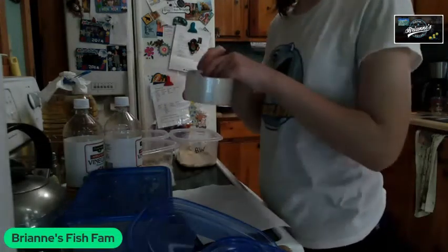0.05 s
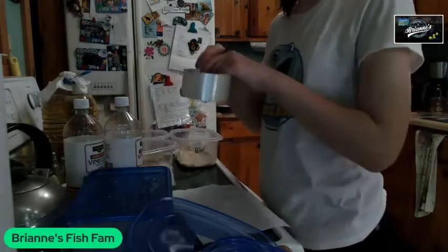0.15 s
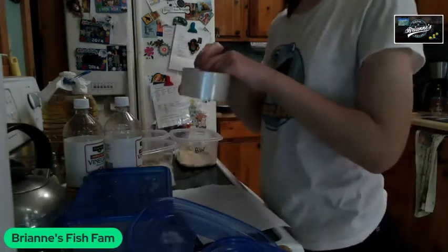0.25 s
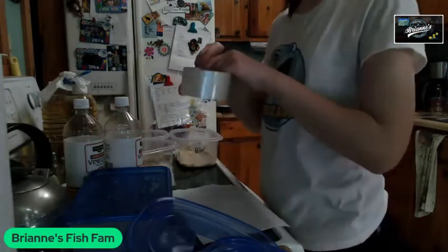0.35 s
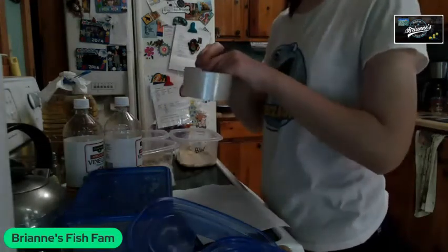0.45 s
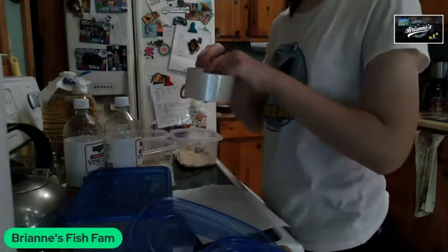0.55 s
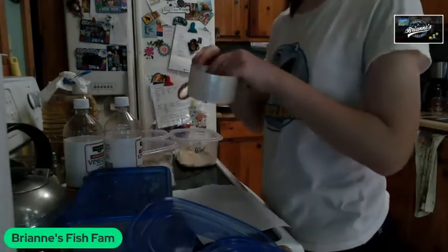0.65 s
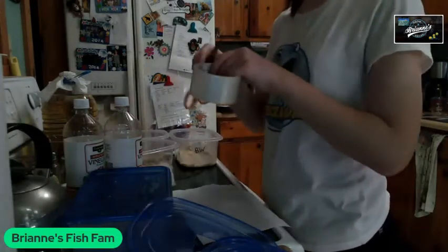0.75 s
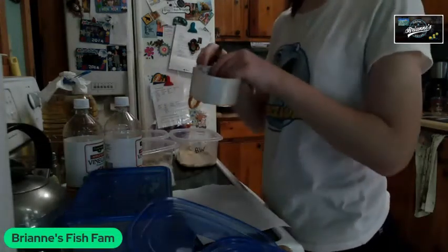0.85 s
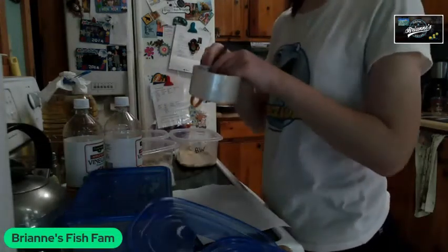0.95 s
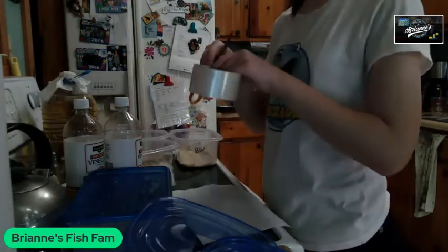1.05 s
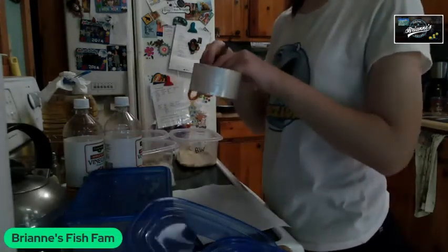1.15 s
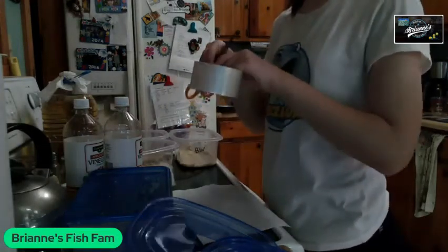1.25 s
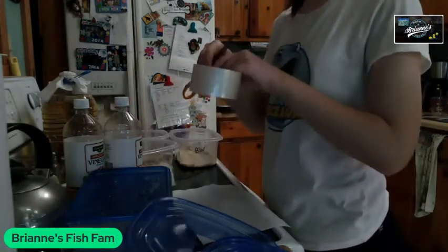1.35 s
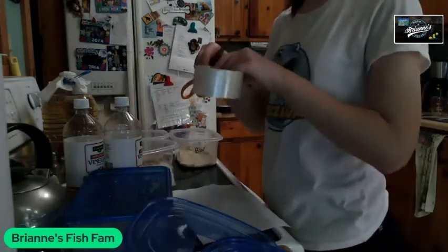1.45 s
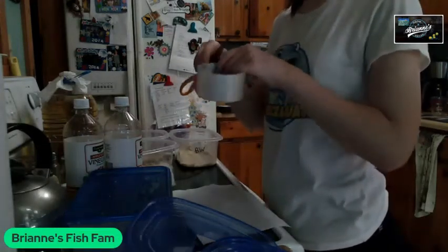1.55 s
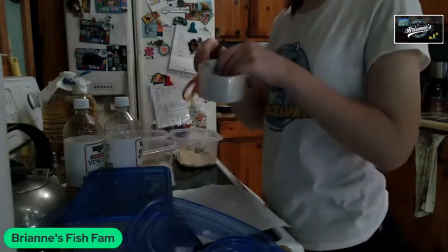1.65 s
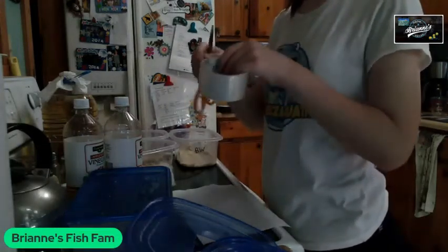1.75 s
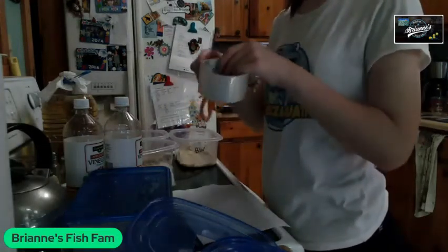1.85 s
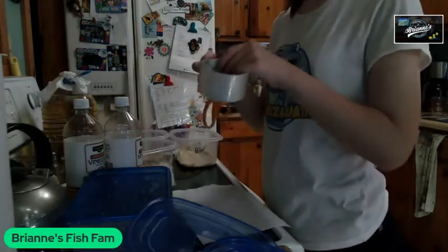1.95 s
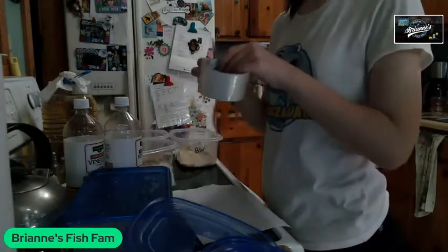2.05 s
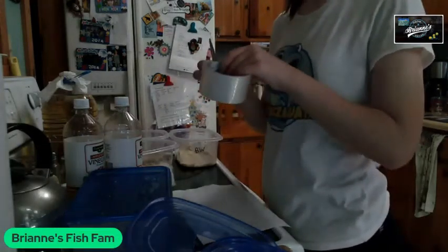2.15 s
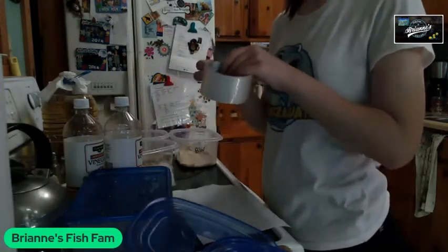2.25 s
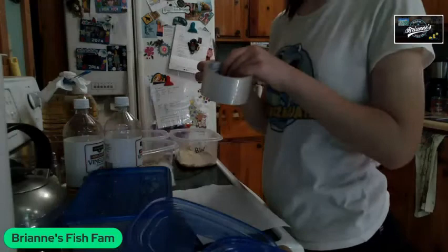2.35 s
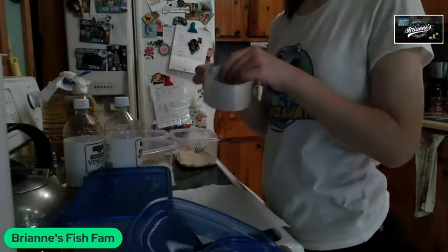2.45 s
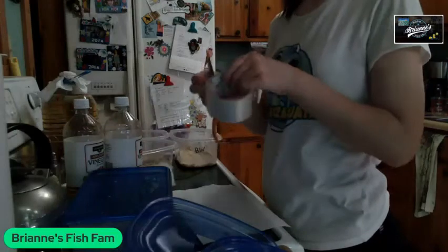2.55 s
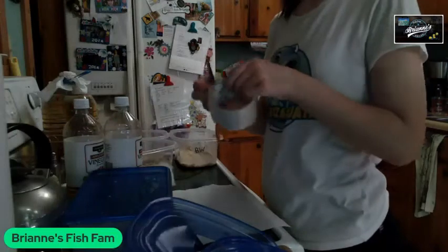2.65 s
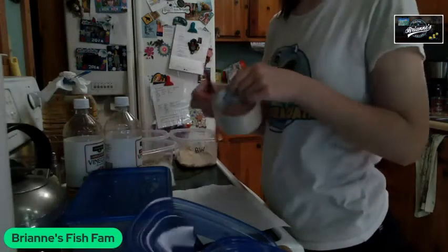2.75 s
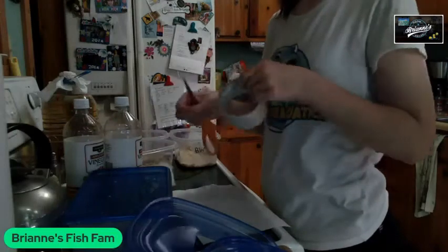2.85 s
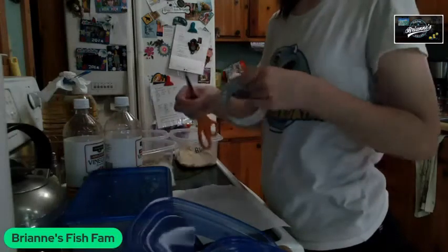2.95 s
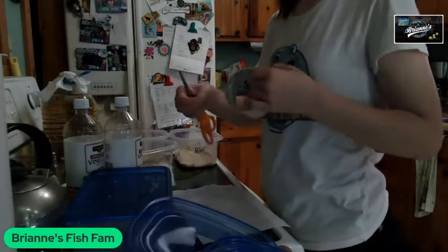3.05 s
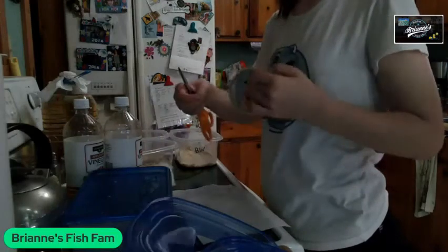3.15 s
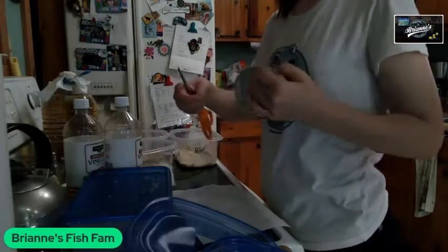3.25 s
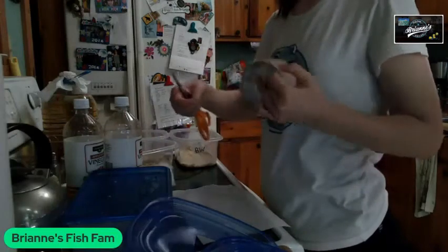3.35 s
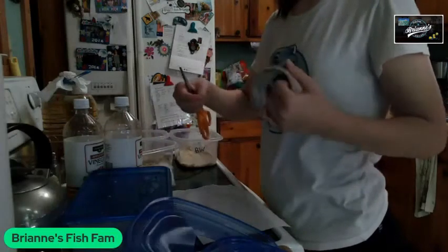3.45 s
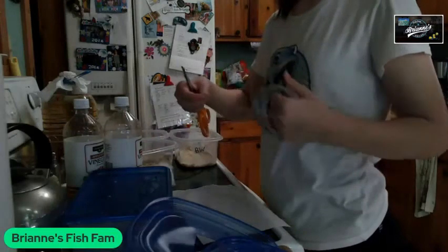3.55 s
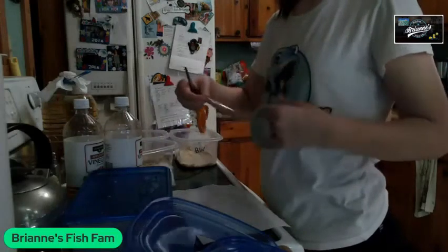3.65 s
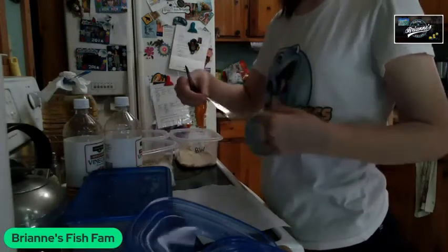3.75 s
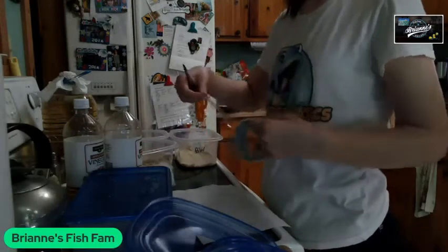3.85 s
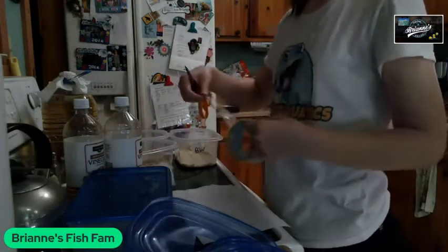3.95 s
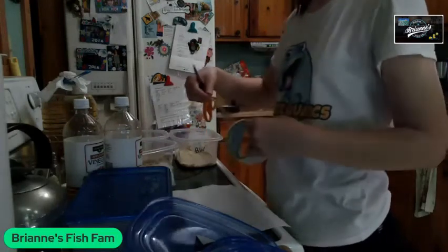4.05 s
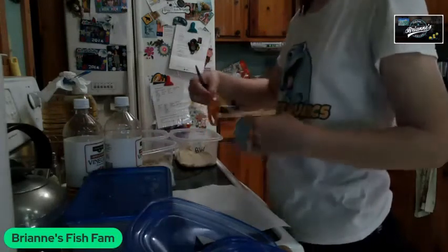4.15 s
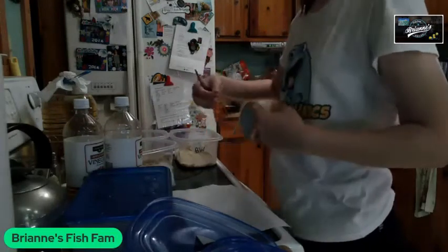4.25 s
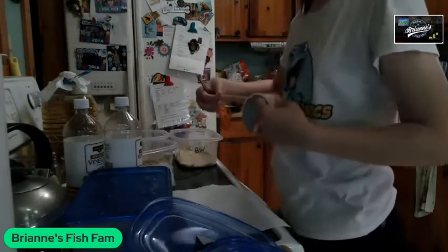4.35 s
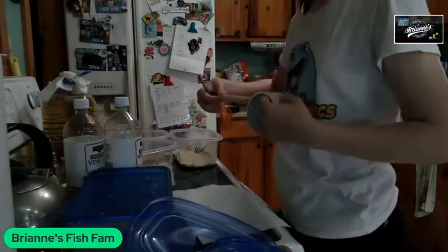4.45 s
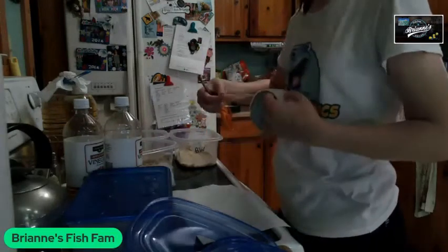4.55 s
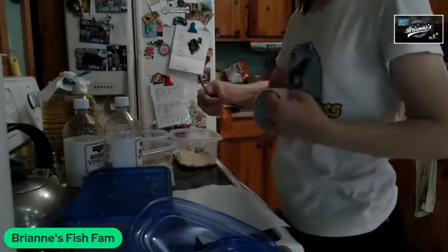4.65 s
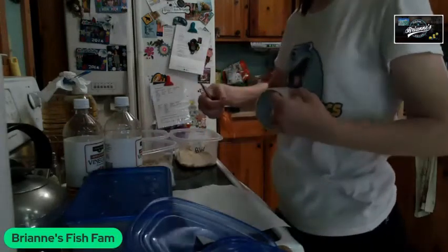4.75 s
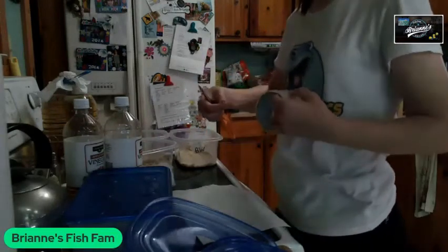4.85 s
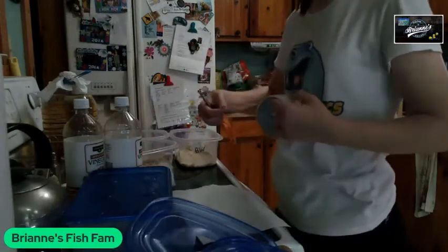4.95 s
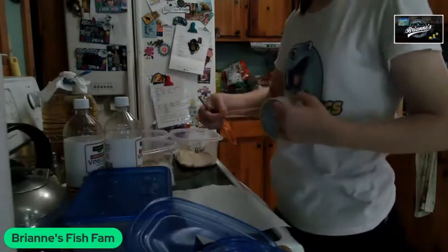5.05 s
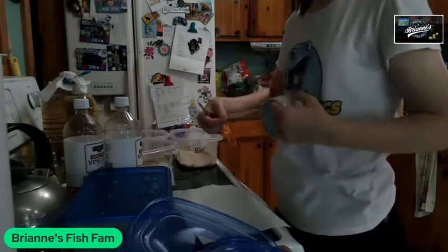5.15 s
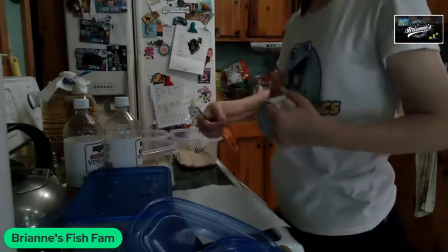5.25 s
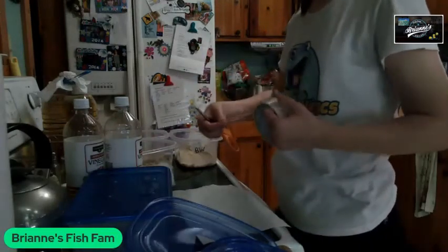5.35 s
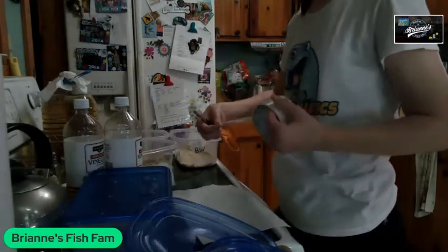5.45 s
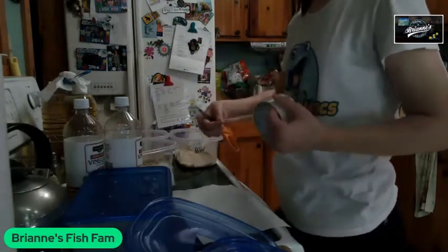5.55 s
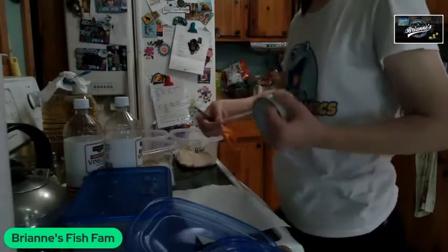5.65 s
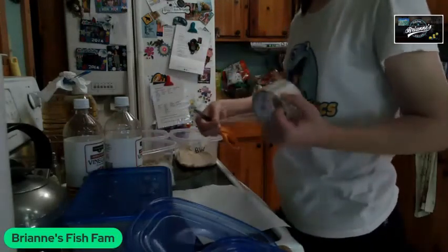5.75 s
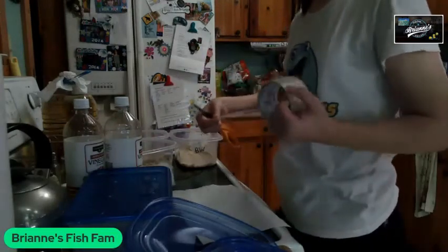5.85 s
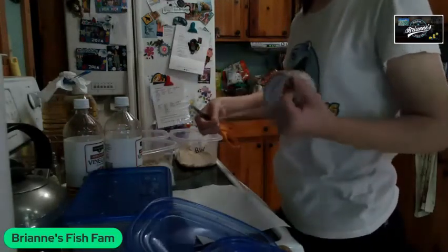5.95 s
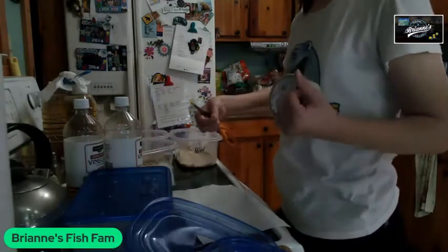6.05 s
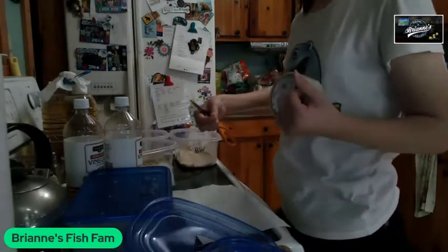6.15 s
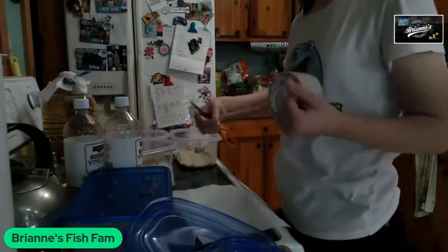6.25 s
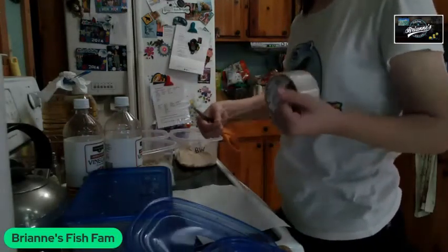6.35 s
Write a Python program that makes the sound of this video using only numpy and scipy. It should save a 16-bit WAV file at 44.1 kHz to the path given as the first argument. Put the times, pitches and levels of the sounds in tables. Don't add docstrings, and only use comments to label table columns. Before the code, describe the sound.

Clear packing tape is ripped off its roll in short, harsh, crackling bursts close by, in a quiet kitchen with a faint hum and soft bubbling.

```python
import sys
import numpy as np
from scipy import signal
from scipy.fft import rfft, irfft, next_fast_len
from scipy.io import wavfile
from scipy.ndimage import uniform_filter1d, minimum_filter1d, map_coordinates

SR = 44100
rng = np.random.default_rng(int(sys.argv[2]) if len(sys.argv) > 2 else 0)


def boost_factor(decibels):
    exponent = np.asarray(decibels, float) / 20
    return 10 ** exponent


def to_wav(sig):
    pcm = np.clip(np.atleast_2d(sig), -1, 1) * 32767
    pcm = np.round(pcm).astype(np.int16)
    wavfile.write(sys.argv[1], SR, pcm.T)


N = 282240

# start_s, length_s, rip_db, tension_db, fizz_db
JERKS = [
    (2.464, 0.0052, -25.5, -57, -9.5),
    (2.49, 0.014, -12.5, -35, -8.5),
    (2.729, .009, -11.5, -30.5, -5.5),
    (2.758, .11, -12, -11, -8.5),
    (2.975, .025, -15.5, -21.5, -13),
    (3.257, 0.11, -6.5, -14.5, -10),
    (5.394, 0.091, -10.5, -17, -13.5),
    (5.667, 0.1, -8.5, -15.5, -12.5),
    (5.922, .063, -10, -13, -12.5),
]


def unit(x):
    return x / np.sqrt(np.mean(x ** 2) + 1e-20)


def along(points, hz):
    f, v = np.transpose(points)
    return np.interp(np.log(hz + 1), np.log(f + 1), v)


def wobble(rate):
    knots = rng.standard_normal(int(N * rate / SR) + 4)
    return map_coordinates(knots, [np.arange(N) * rate / SR])


def filtered(x, response):
    m = next_fast_len(N + SR // 2)
    h = response(np.fft.rfftfreq(m, 1 / SR))
    h = h / np.sqrt(np.mean(abs(h) ** 2))
    return irfft(rfft(x, m) * h, m)[:N]


def causal(gain):
    def response(hz):
        c = irfft(np.log(gain(hz) + 1e-4))
        c[1:len(c) // 2] *= 2
        c[len(c) // 2 + 1:] = 0
        return np.exp(rfft(c))
    return response


def colour(spectrum):
    return causal(lambda hz: boost_factor(along(spectrum, hz)))


def modes(table):
    def gain(f):
        total = 0
        for centre, width, db in table:
            damping = (f * width) ** 2
            total = total + boost_factor(db) ** 2 * damping / ((centre * centre - f * f) ** 2 + damping)
        return total ** 1.06
    return causal(gain)


def patchy(x, depth_db, size):
    z = signal.stft(x, nperseg=size)[2]
    field = uniform_filter1d(rng.standard_normal(z.shape), size=5, axis=0)
    field = uniform_filter1d(field, size=8, axis=1)
    return unit(signal.istft(z * boost_factor(depth_db * unit(field)), nperseg=size)[1][:N])


def bubbles(rows):
    t, out = np.arange(-SR // 16, SR // 16) / SR, np.zeros(N + SR)
    for s, hz, db in rows:
        life = 0.012 + 1.6 / hz
        tone = np.sin(2 * np.pi * hz * t * (1 + .004 * t / life)) * np.exp(-(t / life) ** 2)
        out[round(s * SR):][:len(t)] += boost_factor(db) * tone
    return out[SR // 16:][:N]


def small_bubbles(count, db):
    u, v, w = rng.random((count, 3)).T
    pitch_hz = 250 * 2 ** (3.1 * v)
    return bubbles(np.transpose([u * N / SR, pitch_hz, db + 5 * w - 16 * v]))


def clear_bubbles():
    # peak_time_s, pitch_hz, peak_db
    clear_rows = [(0.03, 384, -56), (0.03, 944, -60), (0.08, 640, -60), (0.165, 243, -55),
                  (0.868, 755, -55.5), (1.791, 1820, -62), (1.881, 895, -58), (1.901, 1510, -64),
                  (2.395, 234, -55), (2.474, 419, -47.5), (2.599, 248, -44.5), (2.674, 272, -48),
                  (3.133, 600, -58), (3.158, 253, -57), (3.472, 260, -57), (3.497, 857, -54),
                  (3.602, 626, -64), (3.846, 260, -62), (3.846, 933, -63.5), (4.016, 750, -63.5),
                  (4.031, 258, -63), (4.22, 269, -56.5), (4.33, 742, -65.5), (4.59, 1010, -68),
                  (4.669, 586, -67), (5.059, 2370, -71), (5.113, 250, -64), (5.582, 412, -47),
                  (6.171, 263, -58.5), (6.366, 254, -59.5)]
    return bubbles(clear_rows)


def kitchen():
    # pitch_hz, level_db
    hum_lines = [(60, 2), (120, -0.5), (180, -2), (240, -13), (300, -10.5), (360, -12), (420, -8.5),
                 (480, -14.5), (1140, -36), (1200, -13.5), (1440, -12), (4801, -17.5), (4981, -20),
                 (5101, -25)]
    # frequency_hz, density_db (per Hz)
    air_spectrum = [(25, -15.5), (90, -7), (170, 1), (260, -10.5), (410, -12.5), (1150, -16), (1400, -24.5),
                    (2350, -23.5), (3100, -31), (4300, -26.5), (5000, -18.5), (7700, -35.5), (11800, -36.5),
                    (15500, -71.5)]
    # time_s, gain_db
    gain_curve = [(0.0, -53), (1.5, -53.5), (2.74, -52), (2.9, -59), (3.45, -57), (3.85, -60.5), (5.4, -61),
                  (5.63, -54.5), (6.1, -57), (6.4, -60)]
    t = np.arange(N) / SR
    hum, buzz = np.zeros(N), np.zeros(N)
    for hz, db in hum_lines:
        phase = 2 * np.pi * (hz * t + 0.18 * rng.random())
        hum -= boost_factor(db + .8 * wobble(2.4)) * np.cos(phase)
    for hz in 60.01 * np.arange(9, 112):
        db = along(air_spectrum, hz) + rng.standard_normal()
        buzz += boost_factor(db) * np.sin(2 * np.pi * (hz * t + rng.random()))
    flow = patchy(rng.standard_normal(N), depth_db=2.5, size=512)
    air = unit(filtered(flow, lambda hz: boost_factor(along(air_spectrum, hz))))
    mix = boost_factor(-2.5) * hum + boost_factor(-4.5) * buzz + boost_factor(-2.0) * air + small_bubbles(count=190, db=-3)
    return boost_factor(np.interp(t, *np.transpose(gain_curve))) * mix


def walls(x):
    # frequency_hz, t60_s
    decay_times = [(200, 0.075), (1000, 0.23), (5000, 0.27), (11000, 0.26), (15000, .17)]
    out = np.zeros(N + SR)
    starts = [round((s + part * length) * SR) for s, length, *_ in JERKS for part in (0, .5)]
    edges = [0] + sorted(starts) + [N]
    for a, b in zip(edges, edges[1:]):
        hz, t, z = signal.stft(rng.standard_normal(SR // 2), SR, nperseg=256)
        decay_db = -60 * t / along(decay_times, hz)[:, None] - 1300 * t ** 3
        tail = signal.istft(z * boost_factor(decay_db), SR, nperseg=256)[1]
        wet = signal.fftconvolve(x[a:b], tail / np.linalg.norm(tail))
        out[a + 130:][:len(wet)] += wet
    return out[:N]


def twangs():
    # start_s, pitch_hz, level_db, t60_s
    twang_rows = [(1.321, 4000, -44, .06), (1.324, 4450, -41, .05), (1.322, 5350, -43, .1),
                  (1.333, 4500, -44, .04), (1.332, 5400, -45, .05), (1.337, 4050, -46, .09),
                  (1.344, 5330, -40, .07), (1.352, 4600, -49, .05), (.93, 3500, -58, .09),
                  (2.09, 4000, -58, .12), (2.27, 5600, -57, .12), (3.925, 5500, -61, .12)]
    t, waver, out = np.arange(N) / SR, 0.7 * wobble(150), np.zeros(N)
    for s, hz, db, t60 in twang_rows:
        rise = np.clip((t - s) / .006, 0, 1)
        decay = boost_factor(db - 60 * abs(t - s) / t60)
        out += rise * decay * np.sin(2 * np.pi * hz * t + waver)
    return out


def slips(per_second, grain_db):
    hit = rng.random(N) < per_second / SR
    size = hit * boost_factor(grain_db * rng.exponential(1, N))
    spray = signal.lfilter([1], [1, -np.exp(-1 / (0.0015 * SR))], size)
    clicks = 0.46 * size * np.sign(rng.standard_normal(N))
    raw = clicks + (spray + .5) * rng.standard_normal(N)
    return raw / np.sqrt(abs(uniform_filter1d(raw ** 2, size=SR // 40)))


def picking():
    # start_s, peak_db; the two near 3.23 s are a faint creak leading into the strongest pull
    pick_rows = [(1.32, -37), (1.7419, -48), (2.0894, -52), (2.2283, -54), (2.2697, -49.5), (2.379, -51),
                 (3.222, -42.5), (3.238, -42), (3.8394, -47.5), (3.8694, -47.5), (3.921, -45),
                 (4.56, -51.5)]
    # frequency_hz, density_db (per Hz)
    pick_spectrum = [(3000, -26.5), (3700, -17.5), (4100, -10.5), (4700, -6), (5350, -8), (5900, -12.5),
                     (7700, -18.5), (10000, -24), (15000, -52)]
    t60_s = 0.078
    t, shape = np.arange(N) / SR, np.zeros(N)
    for s, db in pick_rows:
        decay = boost_factor(db - 5.5 - 60 * abs(t - s) / t60_s)
        shape += (t >= s) * decay * np.clip((t - s) / .006, 0, 1)
    return filtered(shape * slips(400, 1.4), colour(pick_spectrum))


def jerk_levels():
    # roll_db, film_db, start_db
    grip = [(-14.5, -28.5, -4), (-13, -19.5, -2), (-14, -19.5, -1), (-11.5, -11.5, -7.5), (-2.5, -13, -1.5),
            (-11.5, -12, -7), (-12.5, -15.5, -3), (-9.5, -13.5, -2.5), (-9, -14, -2)]
    creep_s, release_s, release_db_per_s = 0.0073, .045, 701
    sag_db, fizz_sag_db = -3.97, -2.5
    core_lag_s, core_lag_db = 0.058, -6
    film_lag_s, film_lag_db = 0.0074, -2
    attack_share = .25
    t, level = np.arange(N) / SR, np.full((5, N), -120.)
    for (s, length, rip_db, tension_db, fizz_db), (roll_db, film_db, start_db) in zip(JERKS, grip):
        on = (t >= s - creep_s) & (t < s + length + release_s)
        u = t[on] - s

        def late(lag_s, lag_db):
            return lag_db * np.clip(1 - u / lag_s, 0, 1)

        done = np.clip(u / length, 0, 1)
        creep = (u < 0) * (-3 + 13 * u / creep_s)
        release = -release_db_per_s * np.maximum(u - length, 0)
        rip = rip_db + late(attack_share * length, start_db) + creep + sag_db * done + release
        core = tension_db + late(core_lag_s, core_lag_db)
        film = film_db + late(film_lag_s, film_lag_db)
        fizz = fizz_db + fizz_sag_db * done - 7.5 * (u < 0)
        level[:, on] = np.maximum(level[:, on], rip + [0 * u, core, film, fizz, core + roll_db])
    return level


def tape():
    # start_s, peak_db
    snap_rows = [(2.469, -17.5), (2.4888, -4), (2.4934, -5), (2.5004, -2), (2.5044, -4), (2.5294, -12),
                 (2.7319, 3.5), (2.7334, 3), (2.9759, 11.5), (3.3642, 1.5), (5.3884, -34.5), (5.3936, -8.5),
                 (5.6685, -0.5), (5.9264, 13)]
    # frequency_hz, density_db (per Hz)
    rip_spectrum = [(2400, -57), (3100, -20.5), (3600, -12.5), (4100, -7.5), (4500, -3.5), (4900, -0.5),
                    (5500, -2.5), (6300, -9), (7600, -14.5), (9500, -46)]
    fizz_spectrum = [(4120, -21), (7000, -4), (7650, 4.5), (9540, 0), (14900, -17.5), (15800, -25.5)]
    hiss_spectrum = [(8000, -31.5), (11000, -6), (13000, -2), (15800, -1)]
    # pitch_hz, width_hz, level_db
    core_modes = [(480, 69, -5.5), (700, 280, 5), (987.5, 180, 3.5), (1330, 350, 1.76)]
    film_modes = [(1470, 630, 2), (1960, 320, 3.5), (2507, 770, 4.5), (3140, 500, 4)]
    roll_modes = [(191.8, 130, -3.5), (293, 140, -0.5), (456.3, 130, 4)]
    force = patchy(slips(800, 1), depth_db=3.5, size=128)
    shake = patchy(slips(800, 1.1), depth_db=1.2, size=1024)
    level = jerk_levels()
    rip, film, fizz = colour(rip_spectrum), modes(film_modes), colour(fizz_spectrum)
    voices = (rip, modes(core_modes), film, fizz, modes(roll_modes))
    drives = (force, shake, shake, force, shake)
    body = sum(filtered(drive * boost_factor(db), voice) for drive, db, voice in zip(drives, level, voices))
    hiss = patchy(slips(2000, 1.2), depth_db=2.5, size=128) * boost_factor(level[3] - 8.5)
    body = body + filtered(hiss, colour(hiss_spectrum))
    snaps = np.zeros(N)
    for s, db in snap_rows:
        snaps[round(s * SR)] = boost_factor(db)
    crack = filtered(snaps, rip) + boost_factor(-19.5) * filtered(snaps, fizz) + boost_factor(-21.0) * filtered(snaps, film)
    return body + crack


def scene():
    no_bass = signal.butter(3, 150, "high", fs=SR, output="sos")
    near = signal.sosfilt(no_bass, tape() + picking())
    background = kitchen() + boost_factor(4.5) * clear_bubbles()
    return (near + boost_factor(-2.0) * walls(near) + boost_factor(0.5) * twangs() + background)[None]


def low_pass(x):
    return signal.sosfilt(signal.butter(12, 16450, fs=SR, output="sos"), x)


def record(dry):
    rate = 1 / (.06 * SR)
    power = signal.lfilter([rate], [1, rate - 1], dry ** 2)
    x = boost_factor(-0.5) * dry * (1 + power / boost_factor(-11) ** 2) ** -.25
    room_left = np.minimum(1, .8 / (abs(x) + 1e-9))
    x = x * uniform_filter1d(minimum_filter1d(room_left, size=120), size=60)

    def edge(hz):
        return np.clip((15850 - hz) / 150, 0, 1) ** 2

    return low_pass(filtered(x[0], edge)[None])


dry = scene()
out = record(dry)
to_wav(out)
```